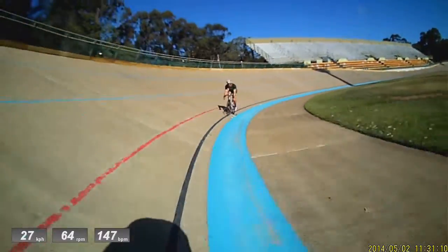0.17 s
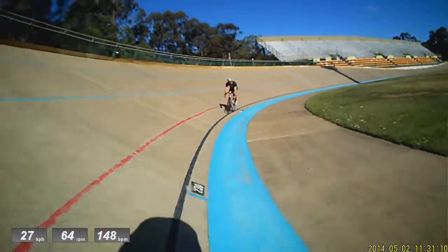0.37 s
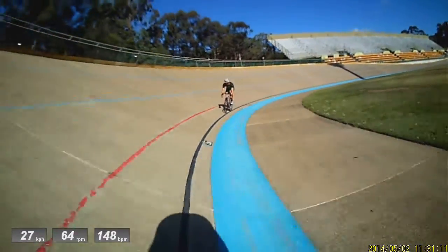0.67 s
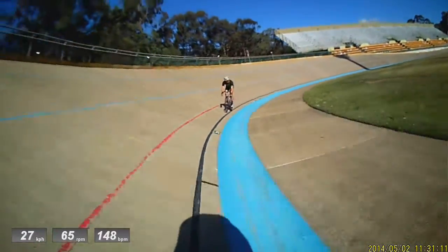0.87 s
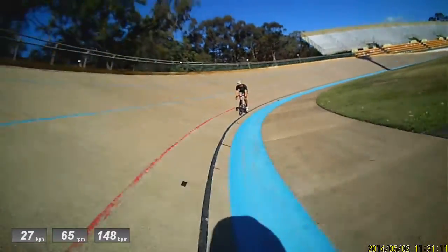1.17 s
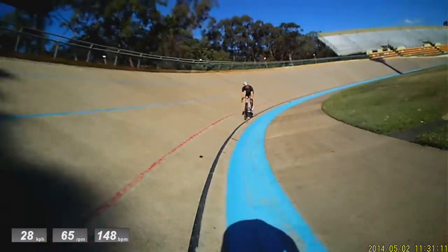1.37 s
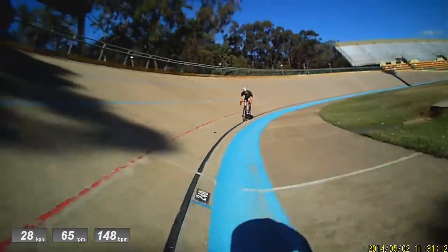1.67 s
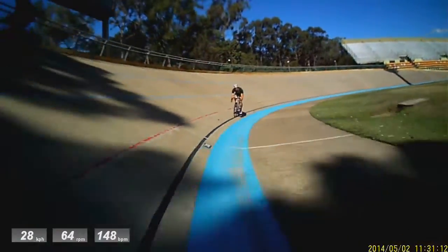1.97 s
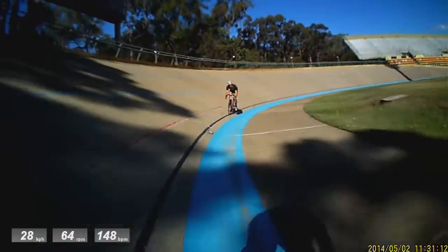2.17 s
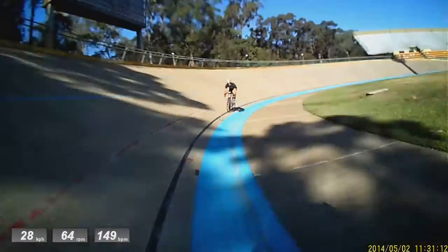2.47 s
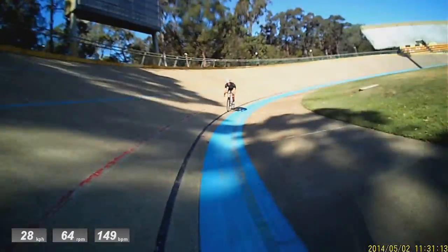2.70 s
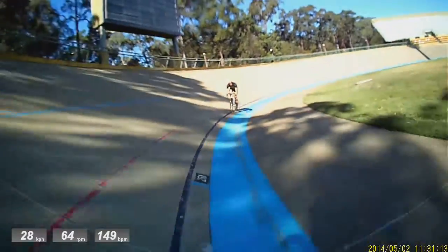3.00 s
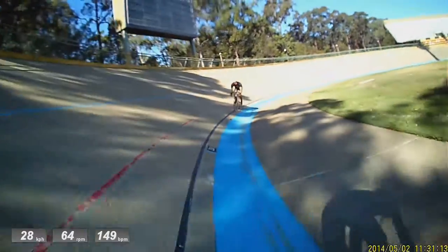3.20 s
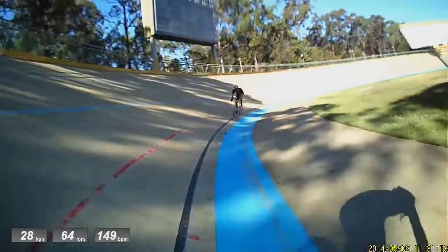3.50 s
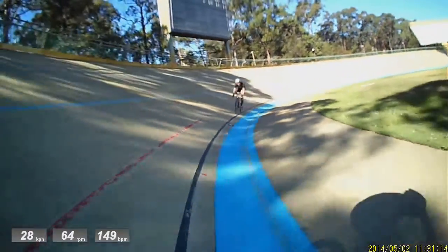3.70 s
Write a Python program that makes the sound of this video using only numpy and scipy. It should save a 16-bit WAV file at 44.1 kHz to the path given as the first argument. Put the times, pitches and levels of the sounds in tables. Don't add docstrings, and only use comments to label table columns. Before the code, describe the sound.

Low wind rumbles against a small microphone mounted on a bicycle circling an outdoor concrete track. Isolated thuds land around 0.4-0.5 and 1.4 seconds; from about 2.2 seconds buffets come thicker and rougher, strongest near 2.3, continuing to the end near 3.9. Beneath run faint tyre hiss, rapid chain ticking with irregular sharper metallic slaps, and tiny grit snaps. The thin treble comes and goes in patches.

```python
import sys
import numpy as np
from scipy import signal
from scipy.io import wavfile
from scipy.ndimage import uniform_filter1d

SR = 44100
rng = np.random.default_rng(int(sys.argv[2]) if len(sys.argv) > 2 else 0)


def wav_record(signal):
    frames = np.transpose(np.atleast_2d(signal))
    bounded = np.clip(frames, -1, 1)
    quanta = np.round(bounded * 32767).astype(np.int16)
    wavfile.write(sys.argv[1], SR, quanta)


def invert_db(x):
    u = np.asarray(x, float) / 20
    return 10 ** u


N = 169785

# time in seconds, big eddies in dB, small eddies in dB.
WIND_COURSE = [(0.0, -31, -46.5), (0.27, -24.5, -43), (0.36, -35.5, -44), (0.42, -23, -75),
               (0.65, -32, -63), (0.72, -29.5, -72), (1.53, -24, -54), (1.91, -28.5, -83),
               (2.11, -23.5, -41), (2.27, -20.5, -45.5), (2.3, -20, -36), (2.59, -22.5, -40.5),
               (2.98, -22, -39), (3.1, -22, -34.5), (3.17, -20.5, -41), (3.58, -22, -44),
               (3.62, -37.5, -38.5), (3.85, -16.5, -35)]
# frequency in Hz, level in dB, 60 dB decay time in seconds.
SHELL_MODES = [(2310, -19, .007), (3050, -8, .007), (3269, 1, .012), (3520, -6, .007), (3780, -9, .005),
               (4700, -16, .0015), (6900, -17, .002)]
# time in seconds, peak in dB, shell pitch in Hz.
HARD_SLAPS = [(0.0338, -41, 3200), (0.1306, -46, 3220), (0.1531, -42, 3190), (0.2927, -43, 3270),
              (0.4873, -48, 3200), (0.5531, -44, 3260), (0.6868, -49, 3160), (0.7662, -45, 3300),
              (0.7876, -45, 3370), (0.8046, -41, 3300), (0.8265, -42, 3250), (1.0625, -35, 3280),
              (1.2206, -43, 3120), (1.269, -44, 3140), (1.3957, -50, 3290), (1.4351, -46, 3250),
              (1.4571, -39, 3285), (1.7424, -34, 3280), (1.8178, -50, 3230), (1.8337, -34.5, 3240),
              (1.8916, -44, 3100), (1.9116, -43, 3280), (1.95, -42, 3250), (2.141, -49, 3299),
              (2.1979, -45.5, 3280), (2.2682, -45, 2880), (2.3426, -56, 3250), (2.5027, -52, 3260),
              (2.5386, -41, 3230), (2.6165, -41, 3120), (2.6748, -39, 3210), (2.8644, -43, 3227),
              (2.8838, -42, 3260), (3.0175, -41, 3320), (3.0959, -44, 3250), (3.2655, -55.5, 3370),
              (3.4595, -42.5, 3570), (3.4984, -40, 3330), (3.6681, -40, 3160), (3.7828, -40, 3200)]


def rms_one(x):
    return x / np.sqrt(np.mean(x ** 2) + 1e-20)


def in_time(rows):
    s, *columns = np.transpose(rows)
    return [np.interp(np.arange(N) / SR, s, c) for c in columns]


def drift(rate_hz):
    r = np.exp(-80 * np.pi * rate_hz / SR)
    white = rng.standard_normal(N // 40 + 2002)
    slow = signal.lfilter([1], [1, -2 * r, r * r], white)[2000:]
    return np.interp(np.arange(N) / 40, np.arange(len(slow)), rms_one(slow))


def ring(clicks, hz, t60_s):
    r = invert_db(-60 / (t60_s * SR))
    w = 2 * np.pi * hz / SR
    return signal.lfilter([0, np.sin(w)], [1, -2 * r * np.cos(w), r * r], clicks + 1e-18)


def banded_noise(spectrum, shared_db, own_db, rate_hz):
    hz, db = np.transpose(spectrum)
    edges_hz = hz[0] * 2 ** np.arange(0, np.log2(hz[-1] / hz[0]) + .01, .5)
    out = 0
    together = drift(rate_hz)
    white = rng.standard_normal((2, N + SR // 2))
    for k, (low, high) in enumerate(zip(edges_hz, edges_hz[1:])):
        sos = signal.butter(2, [low, high], "band", fs=SR, output="sos")
        band = signal.sosfilt(sos, white[k % 2])[-N:]
        level_db = np.interp(np.log(low * high) / 2, np.log(hz), db)
        flicker_db = shared_db * together + own_db * drift(rate_hz)
        out = out + invert_db(level_db + flicker_db) * band
    return rms_one(out)


def rolling():
    # frequency in Hz, density in dB per Hz.
    hiss_spectrum = [(200, -21.5), (383, -0.5), (667, -16), (1500, -19.5), (3260, -14.5), (7000, -27.5),
                     (8800, -50), (16000, -35)]
    # frequency in Hz, width in Hz, level in dB.
    resonances = [(379, 24, -56.5), (577, 23, -64), (889.4, 35, -64), (1257, 280, -63.5), (1750, 37, -75.5),
                  (2199, 64, -70), (3372, 310, -62.5), (6840, 690, -76.5), (10200, 550, -79.5),
                  (12700, 790, -87.5)]
    out = invert_db(-56.5) * banded_noise(hiss_spectrum, shared_db=1.8, own_db=2.5, rate_hz=36)
    for hz, width_hz, db in resonances:
        t60_s = np.log(1000) / np.pi / width_hz
        level = invert_db(db + 2 * drift(30.0))
        out += level * rms_one(ring(rng.standard_normal(N), hz, t60_s))
    return out


def snaps():
    # time in seconds, peak in dB.
    cracks = [(0.4203, -47.5), (0.5525, -48.5), (0.6264, -52), (0.711, -49.5), (0.821, -44.5), (0.85, -44),
              (0.883, -50.5), (0.9236, -54), (1.1874, -45.5), (1.268, -45.5), (1.297, -45), (1.3374, -49),
              (1.5695, -48), (1.6651, -46.5), (2.4767, -51), (2.561, -42.5), (2.6468, -45), (2.836, -46),
              (2.8659, -46), (3.3694, -49), (3.4158, -42.5), (3.626, -45.5), (3.6681, -49), (3.6824, -49.5)]
    gain_db, decay_s, low_hz, high_hz = 3.5, 0.0049, 1800, 6990
    s, db = np.transpose(cracks)
    clicks = np.zeros(N)
    clicks[(s * SR).astype(int)] = invert_db(db + gain_db)
    envelope = signal.lfilter([1], [1, -np.exp(-1 / (decay_s * SR))], clicks + 1e-18)
    sos = signal.butter(4, [low_hz, high_hz], "band", fs=SR, output="sos")
    return signal.sosfilt(sos, envelope * rng.standard_normal(N))


def chain():
    # time in seconds, rate in links per second.
    mesh_rate = [
        (0, 56),
        (1.3, 66.5),
        (1.75, 49),
        (2.6, 52.3),
        (3.85, 59.4),
    ]
    start_links, mesh_db, spread_db, mode_spread_db = 0.27, -48, 2.5, 3.5
    jitter_s, contact_s, slap_gap_s = .0008, .0025, .011
    links_per_s, = in_time(mesh_rate)
    s = np.flatnonzero(np.diff(np.floor(start_links + np.cumsum(links_per_s) / SR))) / SR
    luck = rng.standard_normal((220, 2 + len(SHELL_MODES)))[:len(s)]
    s = s + jitter_s * luck[:, 0]
    db = mesh_db + spread_db * luck[:, 1]
    free = np.abs(s[:, None] - np.array(HARD_SLAPS)[:, 0]).min(axis=1) > slap_gap_s
    at = np.clip(s * SR, 0, N - 1).astype(int)
    contact = np.hanning(int(contact_s * SR))
    out = np.zeros(N)
    for k, (hz, level_db, t60_s) in enumerate(SHELL_MODES):
        clicks = np.zeros(N)
        clicks[at] = free * invert_db(db + mode_spread_db * luck[:, 2 + k])
        carrier = np.cos(2 * np.pi * hz / SR * np.arange(len(contact)))
        push = contact * carrier * 2 / contact.sum()
        out += invert_db(level_db) * ring(np.convolve(clicks, push)[:N], hz, t60_s)
    return out


def knocks():
    gain_db, spread_db, rise_s, shell_hz = 6.5, 2.6, 0.0011, 3240
    hz, level_db, t60_s = np.array(SHELL_MODES).T[:, :, None]
    age = np.arange(1024) / SR
    out = np.zeros(N + 1024)
    luck = rng.standard_normal((len(HARD_SLAPS), len(SHELL_MODES), 1))
    for (s, db, pitch_hz), chance in zip(HARD_SLAPS, luck):
        decay = invert_db(db + gain_db + level_db + spread_db * chance - 60 * age / t60_s)
        modes = decay * np.sin(2 * np.pi * hz * pitch_hz / shell_hz * age)
        out[int(s * SR):][:1024] += (1 - np.exp(-age / rise_s)) * modes.sum(axis=0)
    return out[:N]


def bursts():
    # time in seconds, peak in dB, length in seconds, suction in dB.
    eddy_bursts = [(0.129, -29.5, 0.014, -29), (0.408, -22.5, 0.0029, -2.5), (0.418, -22.5, 0.0039, 0.5),
                   (0.517, -20, 0.0054, -9), (0.927, -34, 0.0035, -13), (0.936, -35, 0.0057, -4),
                   (1.397, -19, 0.011, -11), (1.476, -36, 0.055, 12), (1.8, -31.5, 0.0057, 7),
                   (1.887, -36, 0.0085, 12), (1.942, -30, 0.015, -14), (1.975, -35.5, 0.012, 9.5),
                   (2.133, -29.5, 0.012, 1), (2.251, -34, 0.0023, 4), (2.26, -22, 0.018, 1),
                   (2.305, -23, 0.008, 10.5), (2.314, -23, 0.0081, -3.5), (2.334, -11.5, 0.0054, -8),
                   (2.385, -35, 0.012, 5), (2.445, -35.5, 0.019, 8), (2.53, -36, 0.012, 3),
                   (2.584, -29.5, 0.0058, 1), (2.674, -24, 0.0068, 1.5), (2.692, -31.5, 0.0048, -10),
                   (2.735, -34, 0.0073, 9.5), (2.791, -22, 0.0059, -1), (2.816, -23, 0.0055, 7),
                   (2.889, -19.5, 0.01, 9.5), (2.93, -24, 0.01, -9), (2.959, -25.5, 0.0084, -3),
                   (3.053, -20, 0.012, 3.5), (3.215, -18.5, 0.01, 1), (3.244, -26, 0.021, -8),
                   (3.303, -29.5, .007, -7), (3.335, -36, 0.0048, -4), (3.424, -18, 0.0063, 4.5),
                   (3.439, -22.5, 0.0081, 8), (3.455, -22, 0.0098, 5), (3.624, -41, 0.0041, 10),
                   (3.733, -23.5, 0.012, -10)]
    rise_s, suck_gain_db, suck_lag_s, suck_s = .0025, 5.5, 0.0032, 0.0024
    t = np.arange(N) / SR
    puff, dips = np.zeros(N), np.zeros(N)
    for s, db, length_s, suck_db in eddy_bursts:
        age = np.clip(t - s + rise_s, 0, None)
        fall = np.exp(-(age / max(length_s, .003) / 2) ** 2)
        puff += invert_db(db) * (1 - np.exp(-age / rise_s)) * fall
        dip = np.exp(-np.abs((t - s - suck_lag_s) / suck_s) ** 1.54)
        dips -= invert_db(db + suck_db + suck_gain_db) * dip
    return puff, dips


def buffets(puff, dips):
    # frequency in Hz, density in dB per Hz.
    burst_spectrum = [(90, -5.5), (200, 4), (350, -2), (600, -15.5), (1000, -28), (1500, -49.5),
                      (2100, -39)]
    eddies = banded_noise(burst_spectrum, shared_db=0, own_db=0, rate_hz=20)
    eddies = eddies / np.sqrt(uniform_filter1d(eddies ** 2, size=500) + 0.069)
    suck = signal.sosfilt(signal.butter(1, 30, "high", fs=SR, output="sos"), dips)
    return invert_db(-5.5) * puff * eddies + suck


def wind(puff):
    # frequency in Hz, density in dB per Hz.
    big_spectrum = [(7.1, -13), (12, 0.5), (27, 8), (46, 3.5), (300, -30.5), (390, -60.5), (660, -120)]
    small_spectrum = [(59, -31), (100, -3), (157, -11), (220, -11), (578, -25), (811, -29), (886, -27.5),
                      (2000, -59.5), (2600, -80), (4400, -120)]
    # centre in seconds, half width in seconds, change in dB.
    swells = [(0.099, 0.014, -2.5), (.34, 0.046, -0.5), (.49, 0.011, -6), (.56, 0.021, -7.5),
              (.65, .02, 0.5), (1.04, 0.014, -5), (1.31, 0.026, -5), (1.51, 0.014, -1), (1.66, 0.014, -4),
              (1.721, 0.016, -9), (1.85, 0.014, -3.5), (2.24, .015, -9), (2.57, .04, -9),
              (3.031, 0.0096, 0.5), (3.51, 0.008, 7.5), (3.65, 0.035, 7.5)]
    heave_db, heave_s = 15, .027
    big_db, small_db = in_time(WIND_COURSE)
    t = np.arange(N) / SR
    swell_db = sum(db * np.exp(-((t - s) / width_s) ** 2) for s, width_s, db in swells)
    heave = 1 + invert_db(heave_db) * uniform_filter1d(puff, int(heave_s * SR))
    big = banded_noise(big_spectrum, shared_db=3.0, own_db=0.5, rate_hz=8.4)
    big = big / np.sqrt(uniform_filter1d(big ** 2, size=3000) + 0.31)
    small = banded_noise(small_spectrum, shared_db=5.0, own_db=1.0, rate_hz=15.2)
    return invert_db(big_db + swell_db + 0.48) * heave * big + invert_db(small_db + 0.77 * swell_db) * small


def scene():
    puff, dips = bursts()
    air = wind(puff) + buffets(puff, dips)
    carried = rolling() + chain() + knocks() + snaps()
    return (air + carried)[None]


def drop_faint_treble(x):
    # start in seconds, length in seconds, threshold cut in dB.
    spare = [(0, .07, 11), (0.0, .02, 24), (0.167, .22, 4.5), (0.416, .02, 4), (0.555, .095, 13.5),
             (0.647, .085, 0), (0.695, .04, 30), (0.787, .15, 5), (0.845, .04, 19), (1.047, .02, 34),
             (1.061, .015, 30), (1.163, .2, 4.5), (.95, 0.19, 4.5), (1.253, .03, 2), (1.169, .05, 33),
             (1.287, .035, 9), (1.451, .05, 6), (1.553, .07, 7.5), (0.077, .085, 5.5), (1.664, 0.27, 5.5),
             (1.709, .05, 45), (1.919, .025, 14.5), (2.21, 0.033, 5), (2.035, 0.022, 2.5), (2.475, .025, 9),
             (2.515, .105, 5.5), (2.658, .045, 14), (2.713, .065, 9.5), (2.538, .055, 29),
             (2.822, .06, 4.5), (3.006, .04, 2.5), (3.324, 0.066, 2), (3.369, 0.05, 11.5),
             (3.592, 0.032, 11.5), (3.663, .02, 8), (3.667, .01, 40)]
    starved = [(1.615, .035, -6), (2.285, .05, -19), (.53, .015, -5), (.765, .015, -5), (2.335, .015, -3),
               (2.775, .045, -4), (2.885, .04, -4), (3.08, .03, -1), (3.435, .03, -7), (3.5, .03, -5),
               (3.77, .06, -3)]
    keep_db, tilt_db_per_octave, follows_wind, chance_db, patchy_db = -85, 1.5, .15, 2, 6
    hz, t, z = signal.stft(np.pad(x, (0, 2048), "reflect"), SR, nperseg=2048, boundary="even")
    power = np.mean(np.abs(z[1:].reshape(64, 16, -1)) ** 2, axis=1)
    band_db = 10 * np.log10(power + 1e-16)
    band_hz = hz[8::16, None]
    load_db = np.interp(t, *np.transpose(WIND_COURSE)[:2])
    spare_db = 0
    for s, length_s, db in [*spare, *starved]:
        inside_s = length_s / 2 + .012 - np.abs(t - s - length_s / 2)
        spare_db = spare_db + db * np.clip(inside_s * SR / 1024, 0, 1)
    chance = rng.standard_normal(band_db.shape) + rng.standard_normal(len(t))
    threshold_db = keep_db + tilt_db_per_octave * np.log2(band_hz / 4000)
    threshold_db = threshold_db + follows_wind * (load_db - load_db.mean()) - spare_db + chance_db * chance
    patches = np.repeat(rng.standard_normal((32, len(t))), 2, axis=0)
    threshold_db += patchy_db * (band_hz > 8000) * (.3 + patches)
    z[81:] *= np.repeat(np.clip(band_db - threshold_db, 0, 1), 16, axis=0)[80:]
    return signal.istft(z, SR, nperseg=2048)[1][:N]


def band_limit(x):
    return signal.sosfilt(signal.butter(12, 15000, fs=SR, output="sos"), x)


def record(dry):
    dry = dry * np.clip((N - np.arange(N)) / SR / .008, .3, 1)
    rounded = .42 * np.tanh(dry[0] / .42)
    mix = drop_faint_treble(rounded)[None] - 0.0033
    return band_limit(mix)


dry = scene()
out = record(dry)
wav_record(out)
```